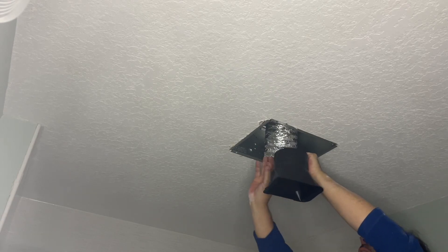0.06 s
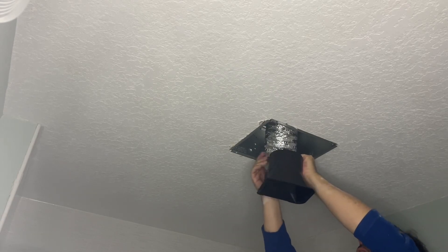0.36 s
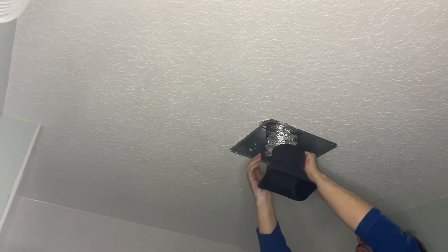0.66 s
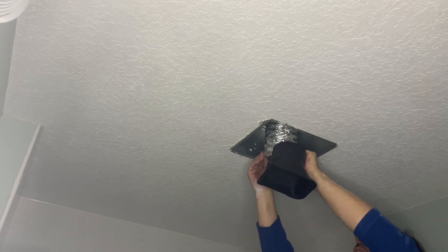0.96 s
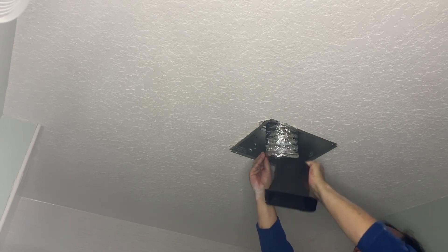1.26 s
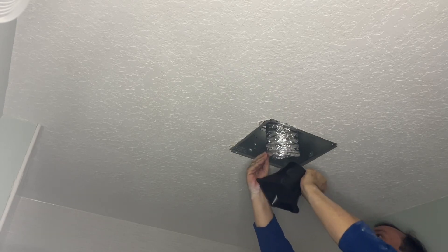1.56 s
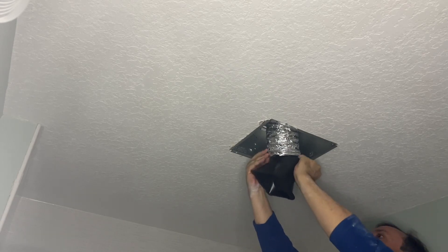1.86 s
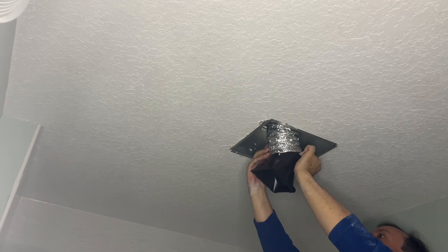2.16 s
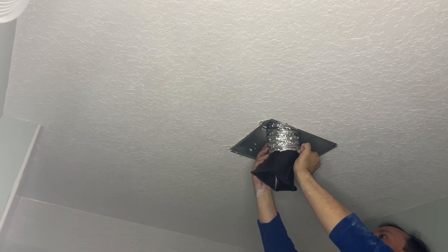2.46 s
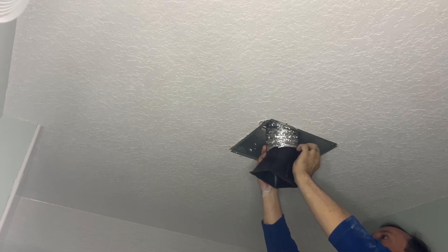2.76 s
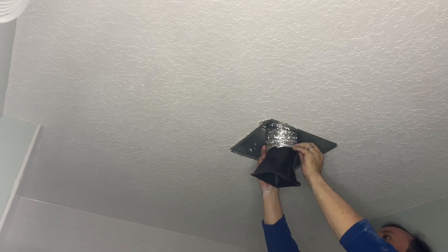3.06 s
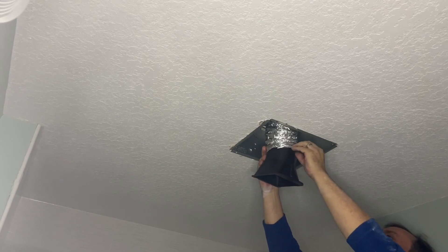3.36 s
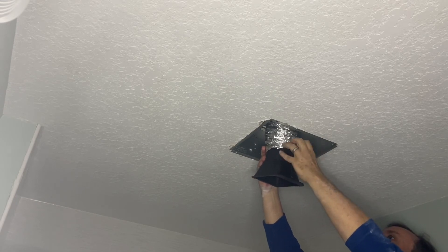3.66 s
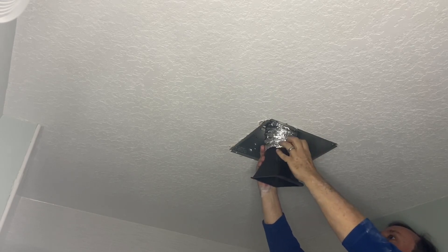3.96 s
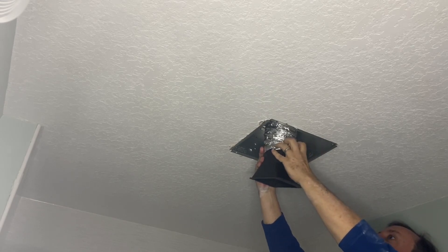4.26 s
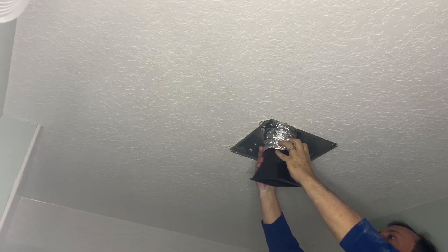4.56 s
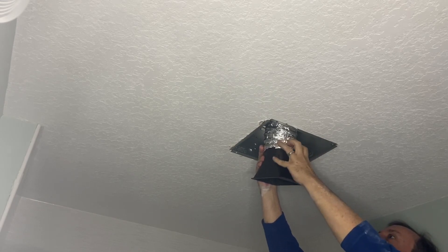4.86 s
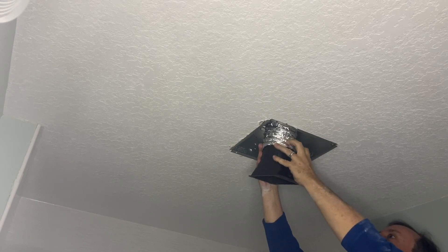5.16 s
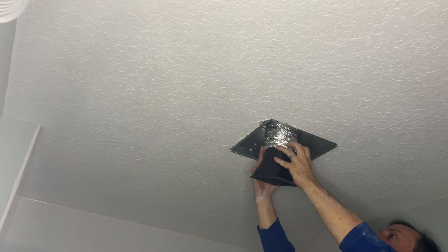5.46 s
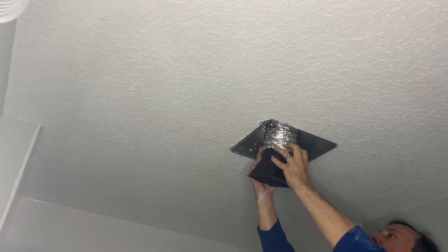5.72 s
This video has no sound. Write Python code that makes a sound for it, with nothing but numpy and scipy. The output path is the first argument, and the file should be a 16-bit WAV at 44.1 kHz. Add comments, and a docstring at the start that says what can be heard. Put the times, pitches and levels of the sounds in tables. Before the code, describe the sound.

Thin foil ducting crinkles and snaps as hands work a plastic fitting into it, knocking and rubbing in a bare room.

```python
"""A knock, a scrape and a low thump: a hand pushes and twists a plastic collar into a hanging foil duct.
Each shove thumps the air in the duct. The foil crinkles as small creases buckle and snaps at large ones.
The collar's rim sticks, slips and knocks on the foil, and its body and walls ring along.
Two microphone ports hear it from a few metres away, over the faint rush of a bare room."""
import sys
import numpy as np
from scipy import signal
from scipy.fft import rfft, irfft, next_fast_len
from scipy.io import wavfile
from scipy.ndimage import uniform_filter1d

SR = 44100
rng = np.random.default_rng(int(sys.argv[2]) if len(sys.argv) > 2 else 0)


def wav_record(signal):
    """Record a signal, one row per channel, as 16-bit PCM in the file named by sys.argv[1]."""
    frames = np.transpose(np.atleast_2d(signal))
    bounded = np.clip(frames, -1, 1)
    # unit amplitude maps onto the largest positive 16-bit level
    quanta = np.round(bounded * 32767).astype(np.int16)
    wavfile.write(sys.argv[1], SR, quanta)


N = 264159
T = np.arange(N) / SR


def amp(db):
    """Decibels to gain."""
    return 10 ** (np.asarray(db) / 20)


def along(rows, hz, column=1):
    """One table column, interpolated over log frequency."""
    rows = np.array(rows, float)
    return np.interp(np.log(hz + 1), np.log(rows[:, 0]), rows[:, column])


def unit(h):
    """Scale to unit energy."""
    return h / np.sqrt(np.sum(h ** 2))


def through(x, h):
    """Convolve with an impulse response."""
    return signal.fftconvolve(x, h)[:N]


def colour(spectrum, size=2048):
    """Minimum-phase, unit-energy response of a (frequency [Hz], level [dB]) spectrum."""
    hz = np.fft.rfftfreq(size, 1 / SR)
    cepstrum = irfft(np.log(amp(along(spectrum, hz))))
    cepstrum[1:size // 2] *= 2
    cepstrum[size // 2:] = 0
    return unit(irfft(np.exp(rfft(cepstrum))))


def ring(modes):
    """Unit-energy response of decaying modes, alternating in sign."""
    t = T[:SR]
    return unit(sum((-1) ** k * amp(db) * np.sin(2 * np.pi * hz * t) * np.exp(-np.log(1000) * t / t60_s)
                    for k, (hz, db, t60_s) in enumerate(modes)))


def slips(rate_hz, scatter_db):
    """Random tiny impulses of uneven size, power levelled over 50 ms."""
    impulses = (rng.random(N) < rate_hz / SR) * rng.choice([-1, 1], N)
    impulses = impulses * amp(scatter_db * np.minimum(rng.exponential(size=N), 4))
    power = np.abs(uniform_filter1d(impulses ** 2, SR // 20))
    return impulses / np.sqrt(power + 0.00081)


def blows(times_s, levels_db, chatter, settle_s, rate_hz):
    """One impulse per blow, then a dying chatter of contacts."""
    out, t = np.zeros(N + SR), T[:SR // 4]
    decay_s = settle_s + 1e-4
    for time_s, db in zip(times_s, levels_db):
        contacts = (rng.random(len(t)) < rate_hz / SR) * rng.standard_normal(len(t))
        blow = chatter * contacts * np.exp(-t / decay_s) / np.sqrt(rate_hz * decay_s / 2)
        blow[0] += 1
        start = int(time_s * SR)
        out[start:start + len(t)] += amp(db) * unit(blow) * np.sqrt(SR / 20)
    return out[:N]


# (frequency [Hz], relative level [dB])
AIR_SPECTRUM = [(25, -12.5), (70, 3.5), (130, -3), (200, -9), (500, -17.5), (1500, -22), (5000, -38.5),
                (15000, -38)]


def room_air():
    """Faint steady rush of the room."""
    return amp(-71) * np.array([through(rng.standard_normal(N), colour(AIR_SPECTRUM)) for _ in range(2)])


# echoes off the nearest surfaces: (delay [s], level re direct [dB])
ECHOES = [(.0079, -3), (.0172, -9)]
# (frequency [Hz], t60 [s])
ROOM_DECAY = [(100, 0.69), (400, 0.35), (1200, 0.42), (3000, 0.29), (8000, 0.26), (15000, 0.096)]


def room(x, wet_db, build_s=0.00022, drift_hz=0.3633, paths=3):
    """Direct sound, first echoes and diffuse tail, as two unrelated views of the room."""
    t, size = T[:SR * 2 // 3], next_fast_len(N + SR, real=True)
    echoes = np.zeros(len(t))
    for delay_s, db in ECHOES:
        echoes[int(delay_s * SR)] = amp(db)
    direct = t == 0
    early = np.array([unit(direct + echoes), unit(direct - echoes)])
    out = rfft(x, size) * rfft(early, size)
    for k in range(paths):
        hz, age_s, noise = signal.stft(rng.standard_normal((2, len(t))), SR, nperseg=256)
        decay = np.exp(-np.log(1000) * age_s / along(ROOM_DECAY, hz)[:, None])
        tails = signal.istft(noise * decay)[1][:, :len(t)]
        tails = np.array([unit(tail * (1 - np.exp(-t / build_s))) for tail in tails])
        # moving hands shift the sound between paths
        share = np.cos(2 * np.pi * drift_hz * T + np.pi * k / paths) * np.sqrt(2 / paths)
        out += amp(wet_db) * rfft(x * share, size) * rfft(tails, size)
    return irfft(out, size)[:, :N] / np.sqrt(1 + amp(wet_db) ** 2)


# air column: (frequency [Hz], relative level [dB], t60 [s])
DUCT_MODES = [(59, -1, 0.18), (73.1, 3, 0.22), (79.9, -3, 0.2), (102, -1.5, 0.35), (117.4, 0.5, 0.17),
              (154.2, -8.5, 0.34)]


def duct(shove_db, knock_times_s, knock_db):
    """Shoves pump the air in the duct, which also booms just after each knock."""
    push = slips(rate_hz=490, scatter_db=1) * amp(shove_db - 2.5)
    push += blows(knock_times_s + 0.01273, knock_db - 0.5, chatter=0.31, settle_s=0.023, rate_hz=390)
    highpass = signal.butter(2, 50, "high", fs=SR, output="sos")
    boom = signal.sosfilt(highpass, through(push, ring(DUCT_MODES)))
    # long waves reach both ports alike: second view empty
    return np.array([boom, np.zeros(N)])


# (frequency [Hz], relative level [dB])
FOIL_SPECTRUM = [(300, -21), (1000, -24), (2000, -25), (3500, -4), (5500, -3), (8000, 2.5), (10500, 1.5),
                 (13000, -5.5), (15500, 2)]
# creases snapping through: (time [s], bright tick drive [dB], duller crack drive [dB])
SNAPS = [(0.306, -63, -75), (0.4187, -51, -59), (0.487, -37.5, -53), (0.8822, -41.5, -58),
         (1.0575, -47, -64), (1.1391, -43, -59), (1.5127, -49, -65), (1.924, -44, -58),
         (2.1685, -70, -56.5), (2.8144, -72, -57.5), (2.8684, -56, -55.5), (3.249, -49.5, -59.5),
         (3.7468, -51, -67), (3.8193, -51.5, -71), (3.8973, -59, -81), (3.974, -59, -60),
         (4.052, -53.5, -58.5), (4.1, -44.5, -53.5), (4.147, -38, -57), (4.3311, -27, -30.5),
         (4.4568, -46, -45.5), (4.6758, -53, -59), (4.84, -48, -50.5), (5.257, -40, -51.5),
         (5.323, -44, -69), (5.3432, -35.5, -66), (5.8251, -42, -57)]


def foil(crinkle_db, rattle_s=0.005):
    """Small creases buckle as the duct bends; now and then a large one snaps."""
    times_s, tick_db, crack_db = np.transpose(SNAPS)
    buckles = slips(rate_hz=900, scatter_db=7) * amp(crinkle_db + 2.5)
    ticks = blows(times_s, tick_db - 10.5, chatter=2.4, settle_s=rattle_s, rate_hz=3200)
    cracks = blows(times_s, crack_db - 7.5, chatter=1.64, settle_s=rattle_s, rate_hz=7200)
    sheet = colour(FOIL_SPECTRUM)
    crease = ring([(2230, 0.22, 0.0016), (3910, 0.97, 0.0023), (6070, -3, 0.0033)])
    snaps = through(ticks, sheet) + through(cracks, crease)
    # large creases face outward: more direct sound
    return room(through(buckles, sheet), wet_db=5) + room(snaps, wet_db=-3, build_s=0.008)


# rim on foil: (time [s], length [s], centre [Hz], bandwidth [Hz], level [dB])
SCRAPES = [(0.111, 0.0092, 2670, 500, -53), (0.306, 0.03, 706, 200, -58), (0.305, 0.11, 1040, 250, -67.5),
           (.313, 0.0056, 2110, 700, -60.5), (0.447, 0.022, 4100, 1500, -63),
           (0.869, 0.38, 12600, 5000, -66), (1.362, 0.0076, 1040, 300, -65),
           (1.615, 0.015, 1290, 250, -61.5), (1.923, 0.024, 960, 201, -50),
           (1.926, 0.033, 1600, 1500, -54.5), (2.033, 0.005, 4630, 330, -43.5),
           (2.073, 0.026, 1480, 600, -55.5), (2.469, 0.029, 1260, 700, -58.5),
           (3.06, 0.014, 2230, 220, -52), (3.11, 0.16, 2100, 400, -72), (4.309, 0.025, 2490, 2520, -54.5),
           (4.776, 0.039, 5350, 703, -57.5), (5.401, 0.041, 1550, 1400, -50.5)]


def scrapes(slip_hz=1100):
    """Short stick-slip squeaks and rasps at listed pitches; one long high hiss of rim on foil."""
    out, t = np.zeros(N + SR), T[:SR // 4]
    for time_s, length_s, hz, width_hz, db in SCRAPES:
        run = (rng.random(len(t)) < slip_hz / SR) * rng.standard_normal(len(t))
        run *= np.exp(-(t / length_s) ** 4)
        rasp = signal.lfilter(*signal.iirpeak(hz, hz / width_hz, SR), run)
        rasp = signal.lfilter(*signal.iirpeak(hz, 1, SR), rasp)
        start = int(time_s * SR)
        out[start:start + len(t)] += amp(db) * unit(rasp) * np.sqrt(length_s * SR)
    return out[:N]


# collar body: (frequency [Hz], relative level [dB], t60 [s])
BODY_MODES = [(220.7, -7, 0.26), (255.6, -12, 0.39), (301, -2.5, 0.13), (334.7, 0, 0.15),
              (380.5, -4, 0.077), (400, -6.5, 0.21), (433, 0, 0.074)]
# flat collar walls: (frequency [Hz], relative level [dB], t60 [s])
WALL_MODES = [(469, 2, 0.022), (558.4, -3, 0.07), (685, 3.5, 0.025), (793, -7, 0.13), (960, 3.5, 0.0091),
              (1123, -0.5, 0.023), (1290, -7.5, 0.11), (1600, -33, 0.015)]
# (frequency [Hz], relative level [dB])
RIM_SPECTRUM = [(400, -47), (900, 5), (1400, 2.2), (1900, 2), (2500, 3.5), (3300, 0.6), (4400, 0.15),
                (5800, 0.5), (8500, -20), (15000, -13)]
# walls ring less once seated in the duct: (time [s], level re mean of rim and body drive [dB])
SEATING = [(1.7, -3.5), (2.7, -12.5)]


def collar(flex_db, slide_db, knock_times_s, rim_db, body_db):
    """The rim sticks, slips and knocks on the foil; body and walls ring along."""
    rub = slips(rate_hz=1600, scatter_db=5.5)
    # body follows flexing, rim follows sliding, walls lie between
    body = rub * amp(flex_db - 4)
    wall = rub * amp((flex_db + slide_db) / 2 - 5.5)
    rim = rub * amp(slide_db - 4)
    wall_db = (rim_db + body_db) / 2 + np.interp(knock_times_s, *np.transpose(SEATING))
    body += blows(knock_times_s, body_db - 2.5, chatter=0.44, settle_s=0.0063, rate_hz=380)
    wall += blows(knock_times_s, wall_db, chatter=1.13, settle_s=0.0067, rate_hz=1100)
    rim += blows(knock_times_s, rim_db - 13.5, chatter=8.2, settle_s=0.007, rate_hz=3300)
    deep = through(body, ring(BODY_MODES))
    bright = through(wall, ring(WALL_MODES)) + through(rim, colour(RIM_SPECTRUM)) + scrapes()
    return room(deep, wet_db=-2.5) + room(bright, wet_db=2)


def hand_moves(moves, rest_db, rise_db_per_s, sag_db_per_s, fall_db_per_s):
    """Two drive levels [dB]: each move swells, sags and dies away over the resting levels."""
    power = amp(rest_db) ** 2
    for time_s, length_s, *drives_db in moves:
        t = T - time_s
        shape_db = rise_db_per_s * np.minimum(t, 0)
        shape_db -= sag_db_per_s * np.clip(t, 0, length_s)
        shape_db -= fall_db_per_s * np.maximum(t - length_s, 0)
        power += (amp(drives_db)[:, None] * amp(np.maximum(shape_db, -100))) ** 2
    return 10 * np.log10(power)


# held collar resting on the foil: (time [s], rubbing drive [dB])
GRIP = [(0, -71.5), (.7, -85), (1.55, -81.5), (1.95, -62.5), (2.4, -66), (3.0, -73), (3.7, -67.5),
        (4.25, -68.5), (4.65, -74), (5.2, -60), (5.99, -58.5)]
# (time [s], length [s], duct air drive [dB], collar flex drive [dB])
SHOVES = [(0.0, 0.033, -49.5, -59.5), (.13, 0.092, -64, -66.5), (.31, 0.049, -74, -63.5),
          (.45, 0.19, -49.5, -60), (.83, 0.042, -56.5, -62), (1.2, 0.13, -64.5, -72),
          (1.62, 0.04, -51, -63.5), (1.79, 0.11, -59.5, -64), (2.06, 0.03, -54, -62),
          (2.54, 0.069, -61.5, -75), (2.72, 0.021, -51.5, -62), (2.83, 0.11, -55.5, -60.5),
          (3.06, 0.061, -61.5, -68.5), (3.42, 0.13, -59.5, -93), (4.02, 0.015, -53, -65),
          (4.355, 0.023, -40, -56), (4.5, .06, -49.5, -70), (4.72, 0.05, -57.5, -61),
          (4.97, 0.017, -53, -71), (5.08, 0.44, -54.5, -58.5), (5.45, 0.12, -52, -60),
          (5.63, 0.063, -54, -50.5), (5.73, .13, -56, -75)]
# (time [s], length [s], rim slide drive [dB], foil crinkle drive [dB])
TWISTS = [(0.0, 0.005, -42.5, -48.5), (.075, 0.047, -51.5, -60.5), (.445, 0.07, -47.5, -54),
          (.815, 0.044, -60, -72), (.875, 0.025, -54.5, -49), (.92, .1, -73, -60), (1.06, 0.14, -69, -59.5),
          (1.62, 0.016, -81, -77), (1.71, 0.015, -63.5, -74), (1.825, 0.16, -55.5, -61),
          (2.035, 0.079, -50, -56.5), (2.23, 0.042, -50.5, -55), (2.455, 0.027, -57, -67),
          (2.58, .06, -57, -81), (2.645, 0.1, -53, -56), (2.79, 0.18, -60.5, -70.5),
          (3.035, 0.049, -53.5, -64.5), (3.12, 0.082, -58.5, -74), (3.305, 0.014, -58.5, -54),
          (3.41, .05, -58, -61.5), (3.49, 0.058, -58, -64), (4.148, .025, -81, -51.5),
          (4.335, .07, -46.5, -54), (4.46, 0.039, -61, -64), (4.525, 0.026, -53.5, -48),
          (4.705, 0.15, -57, -59), (4.89, 0.089, -50, -53.5), (4.97, 0.037, -43, -39),
          (5.04, .13, -72, -51.5), (5.26, 0.034, -53, -59), (5.35, 0.043, -73, -55.5),
          (5.46, 0.01, -39.5, -42.5), (5.51, .12, -49.5, -48.5), (5.66, 0.084, -64, -61),
          (5.83, 0.086, -58, -54.5), (5.95, 0.037, -47.5, -54)]
# collar knocks: (time [s], rim drive [dB], duct air drive [dB], body drive [dB])
KNOCKS = [(0.0034, -39.5, -52.5, -55.5), (0.0845, -43.5, -56, -72), (0.4182, -49, -75, -72),
          (0.4773, -33, -59, -46), (0.4872, -51, -40, -63), (1.1437, -44.5, -53.5, -64.5),
          (1.3659, -67, -60, -63.5), (1.6132, -58, -57, -60), (1.924, -46.5, -70, -81),
          (2.0362, -41.5, -65, -91), (2.2471, -36.5, -69, -62), (2.7018, -34, -73, -53),
          (3.063, -46.5, -57.5, -70), (3.3165, -52.5, -53.5, -50.5), (3.489, -41.5, -70, -73),
          (3.5236, -49.5, -65, -52), (4.3247, -31.5, -65, -47), (4.3313, -26.5, -45, -38),
          (4.4564, -38.5, -57, -68), (4.861, -39, -53.5, -43.5), (4.977, -30, -49.5, -46),
          (5.464, -37, -49, -45.5), (5.5894, -38, -47.5, -57), (5.679, -57, -54, -51)]


def scene():
    """Grip, shoves, twists and knocks drive duct, foil and collar."""
    grip_db = np.interp(T, *np.transpose(GRIP))
    shove_db, flex_db = hand_moves(SHOVES, rest_db=[grip_db - 7.5, grip_db - 8],
                                   rise_db_per_s=597, sag_db_per_s=10, fall_db_per_s=248)
    slide_db, crinkle_db = hand_moves(TWISTS, rest_db=[grip_db, grip_db - 7],
                                      rise_db_per_s=650, sag_db_per_s=14, fall_db_per_s=317)
    knock_times_s, rim_db, boom_db, body_db = np.transpose(KNOCKS)
    plastic = collar(flex_db, slide_db, knock_times_s, rim_db, body_db)
    return duct(shove_db, knock_times_s, boom_db) + plastic + foil(crinkle_db) + room_air()


# microphone pair: (frequency [Hz], left phase lead [rad], coherence [0-1], left minus right [dB])
PORTS = [(100, 0.02, 0.97, 2.2), (220, 0.04, 0.86, 4.3), (330, -0.34, 0.83, 6.6), (470, -0.87, 0.33, 5.4),
         (750, -2.96, 0.29, 0.2), (1400, -1.67, 0.11, 1.0), (2200, 0.0, 0.87, 0.8), (3200, 0.41, 0.64, 3.1),
         (5000, 0.02, 0.7, 0.3), (6300, -1.41, 0.38, 2.7), (7300, -3.17, 0.94, -0.4),
         (8600, -4.07, 0.84, -0.2), (11000, -6.29, 0.98, 0.2), (13000, -8.13, 0.66, -0.2),
         (14500, -9.43, 0.98, -0.2)]


def record(dry, cutoff_hz=16000):
    """The right port hears part of what the left does, phase-shifted; both are low-passed."""
    size = next_fast_len(N + SR // 10)
    hz = np.fft.rfftfreq(size, 1 / SR)
    lead_rad, coherence, balance_db = (along(PORTS, hz, column) for column in (1, 2, 3))
    left, unrelated = rfft(dry, size)
    right = (coherence * left + np.sqrt(1 - coherence ** 2) * unrelated) * np.exp(-1j * lead_rad)
    lean = amp(balance_db / 2)
    ports = irfft(np.array([left * lean, right / lean]), size)[:, :N]
    lowpass = signal.ellip(10, 0.2, 70, cutoff_hz, fs=SR, output="sos")
    return signal.sosfilt(lowpass, ports)


dry = scene()
out = record(dry)
wav_record(out)
```